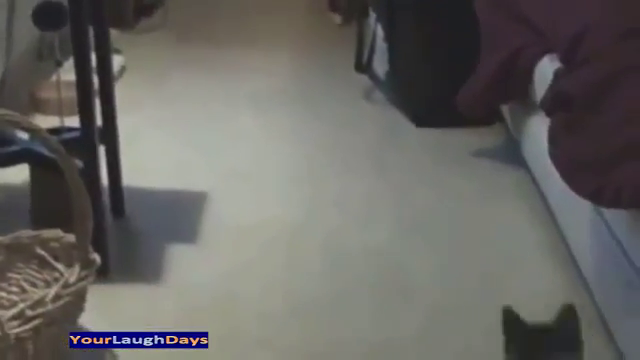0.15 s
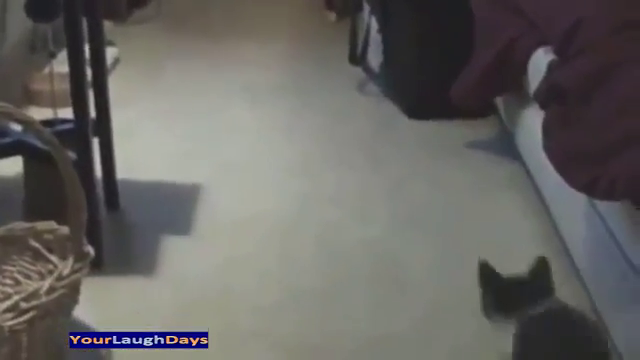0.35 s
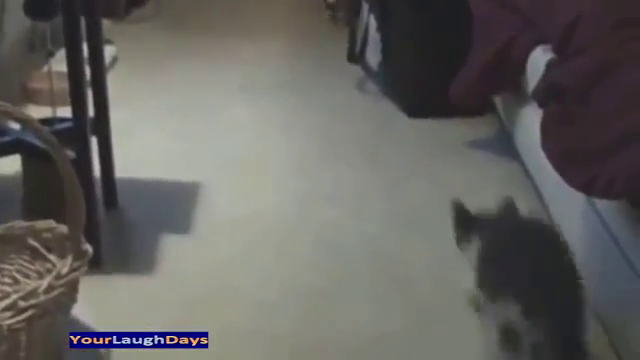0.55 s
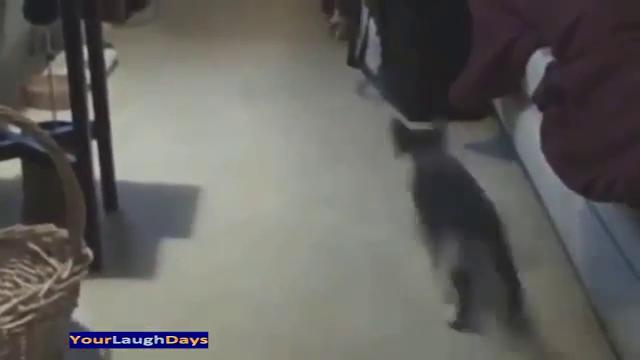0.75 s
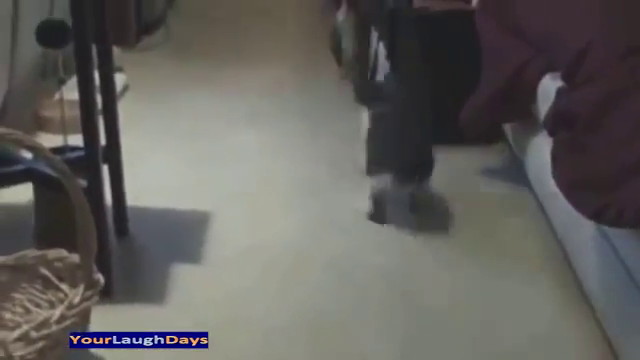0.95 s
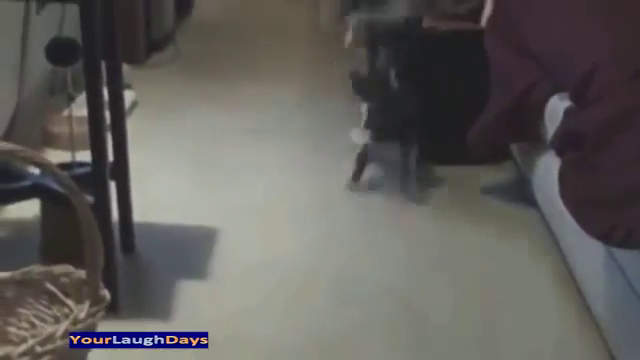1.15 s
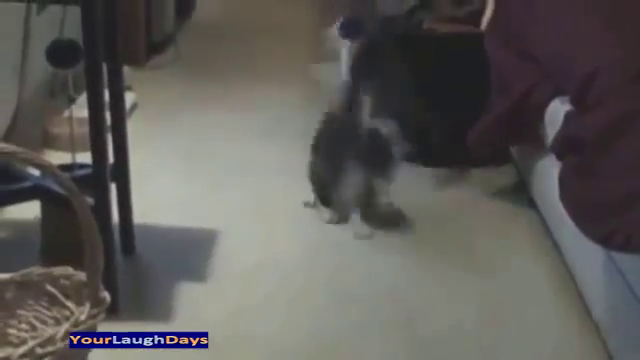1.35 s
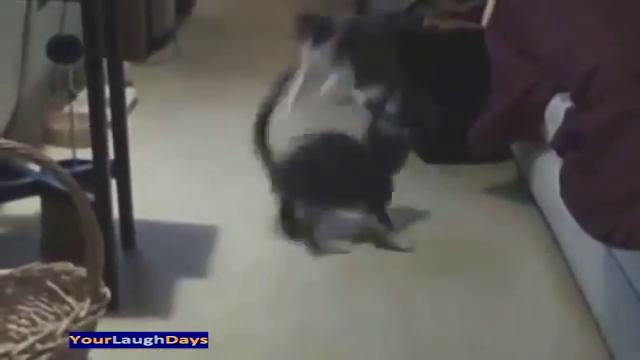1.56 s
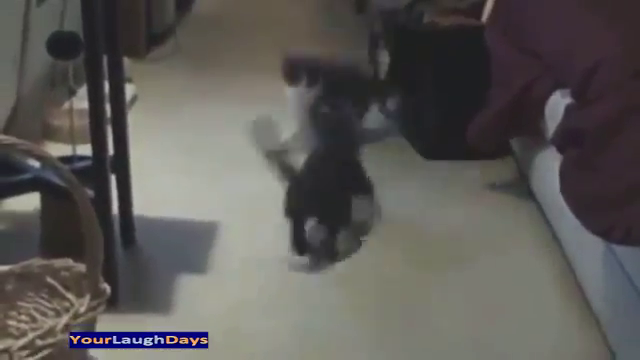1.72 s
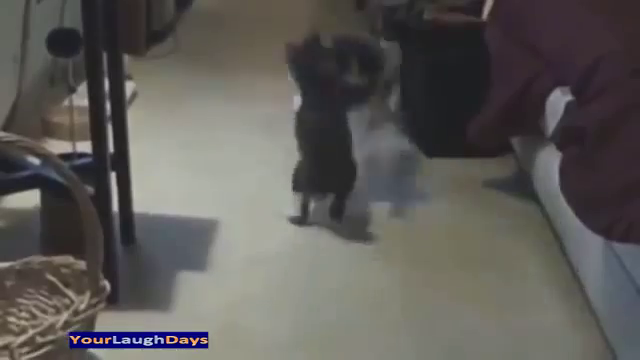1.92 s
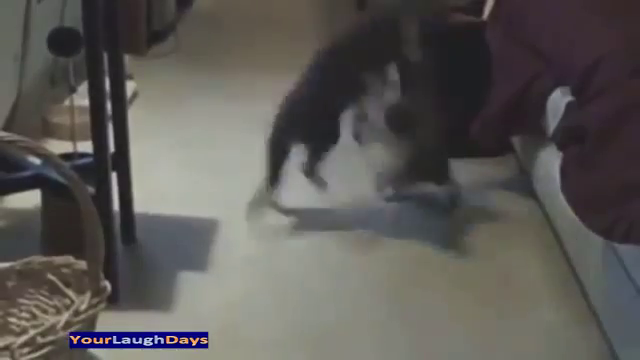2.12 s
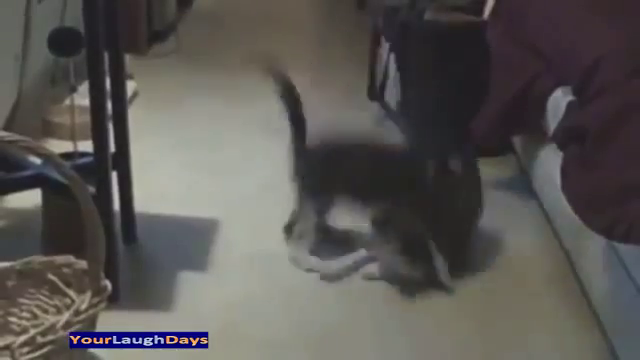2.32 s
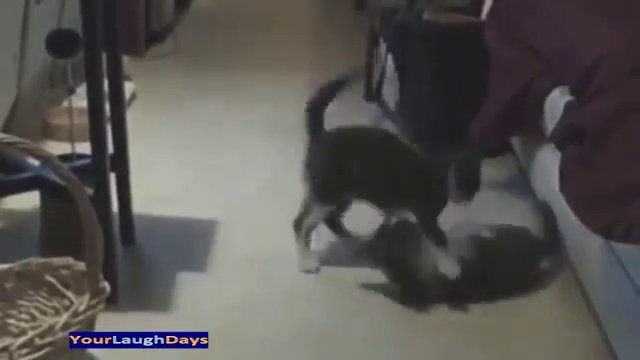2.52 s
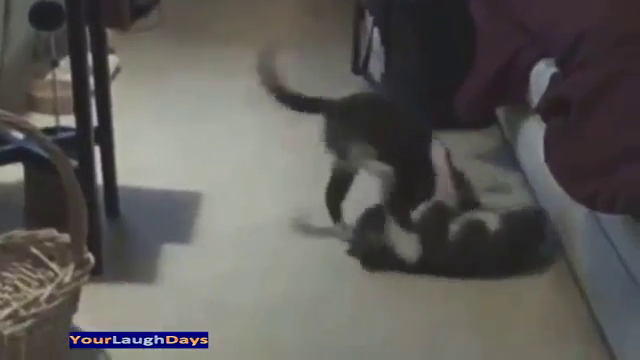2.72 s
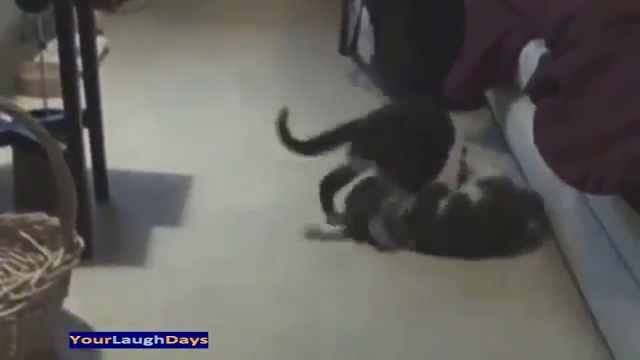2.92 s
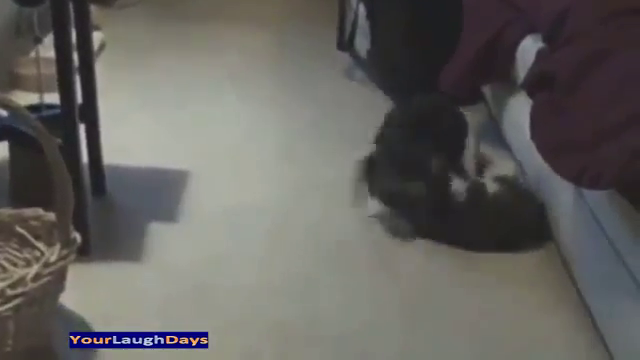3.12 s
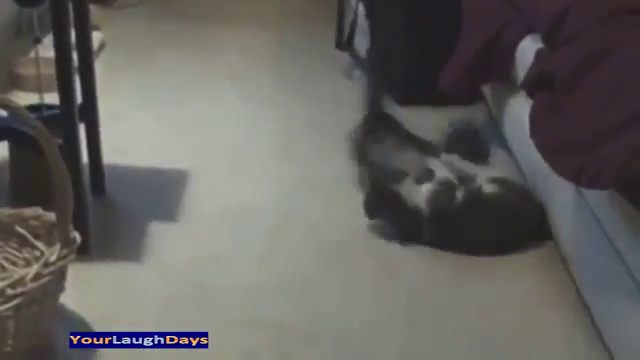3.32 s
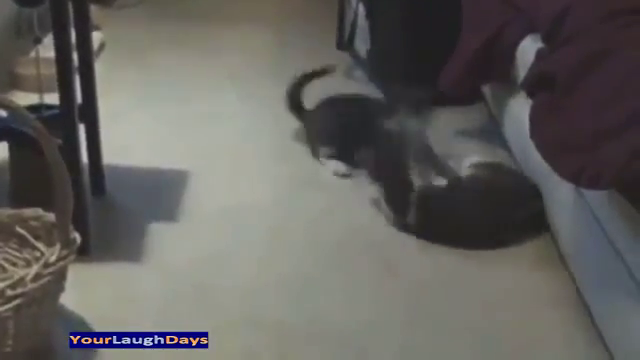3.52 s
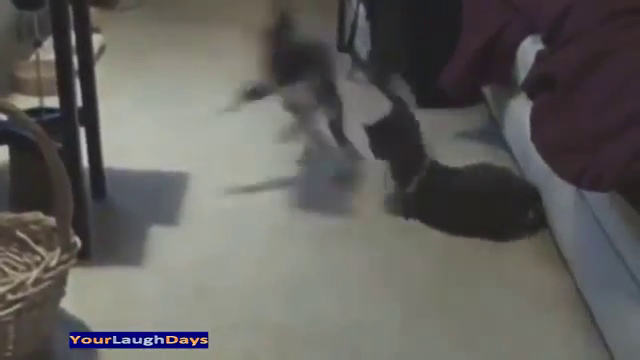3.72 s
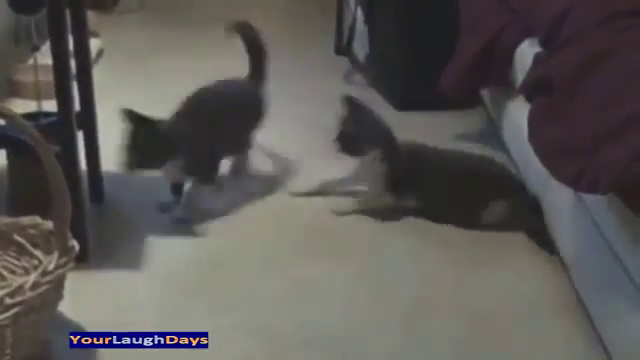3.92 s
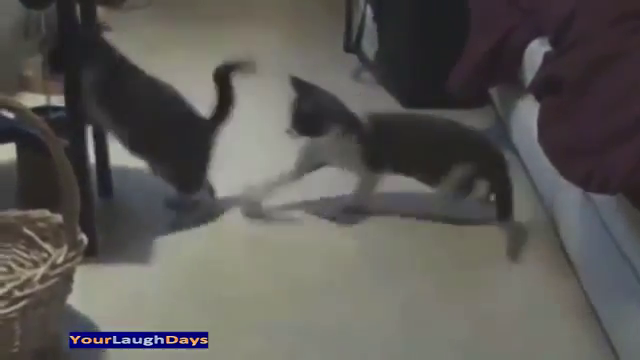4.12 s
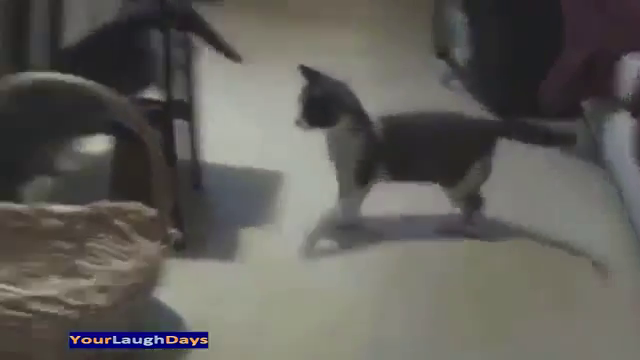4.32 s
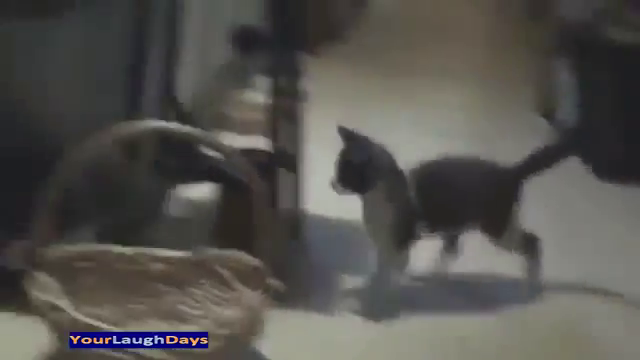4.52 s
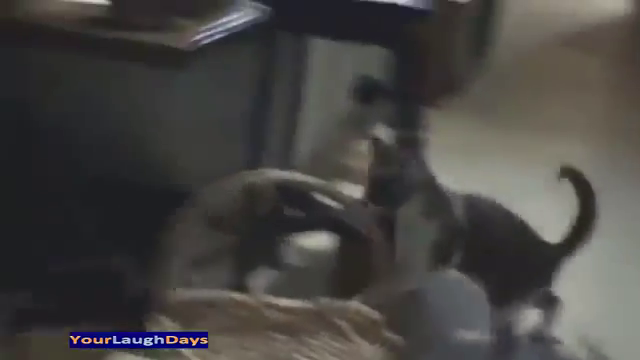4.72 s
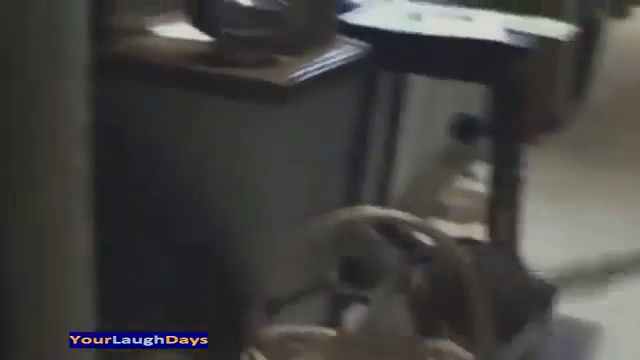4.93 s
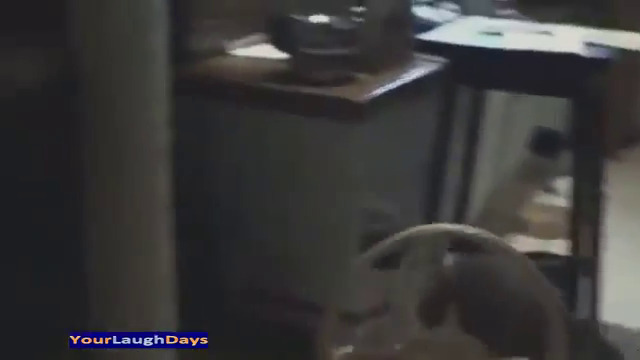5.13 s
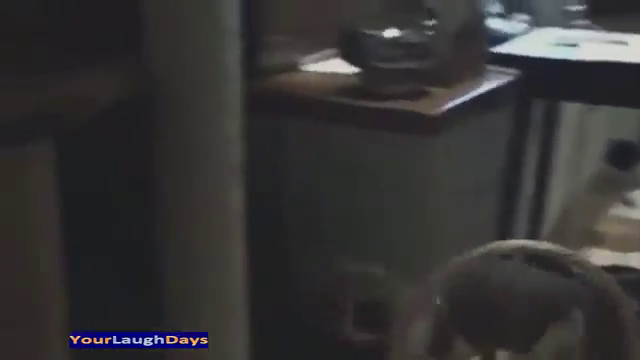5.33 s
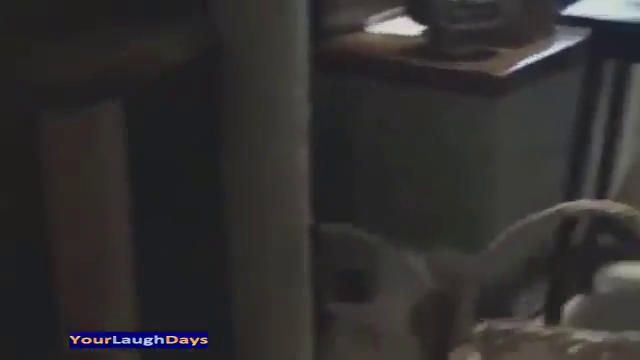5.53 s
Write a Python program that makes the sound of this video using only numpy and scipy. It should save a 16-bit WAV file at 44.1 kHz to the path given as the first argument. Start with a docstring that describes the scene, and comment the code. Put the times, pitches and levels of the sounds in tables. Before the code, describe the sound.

For the first second there is only very faint microphone hiss in a small carpeted room. From about 1.1 s paws begin to land, and by 1.3 s two cats are wrestling: quick, uneven, hollow thumps on springy boards, padded slaps, claw ticks and short grainy drags through the pile. Blows cluster densely at 1.5-1.8 s, then come heavier around 2.0, 2.4, 2.54, 2.65 (the strongest thump) and 2.78 s, with deep bass sway. From 2.9 to 3.5 s it is mostly quiet, with slight shuffling. A low floor boom comes near 3.6 s and a firm knock at 3.75 s; a faint small motor buzzes at 3.5-3.7 and 3.85-4.0 s. Softer footfalls follow from 4.1 s, with a bright claw tick at 4.23 s, thinning to light steps and scratches around 5.3 s. At 5.53 s a sharp, dry plastic click snaps close to the microphone, by far the loudest sound, before the end at about 5.66 s.

```python
"""A small room with a carpeted, springy floor: two cats wrestle near a hand-held camera. Paws and bodies thump
the boards, each blow a set of ringing modes with noisy slaps and rattles. Claws and paws tick as short rings
with noise, claws drag through the pile as grainy noise; the floor sways in the deep bass. A small motor, a
stack of sine orders, buzzes twice; close to the microphone the camera case snaps once. Microphone hiss,
coloured noise of drifting level, lies under it all."""
import sys
import numpy as np
from scipy import signal
from scipy.fft import rfft, irfft
from scipy.io import wavfile
from scipy.ndimage import uniform_filter1d

SR = 44100
rng = np.random.default_rng(int(sys.argv[2]) if len(sys.argv) > 2 else 0)


def dump_mix(stems):
    """Bounce the given channels to the path in sys.argv[1] as a 16-bit WAV at rate SR."""
    frames = np.atleast_2d(stems).T  # one column per channel
    limited = np.clip(frames, -1, 1)  # hard clip at full scale
    pcm = np.round(limited * 32767).astype(np.int16)
    wavfile.write(sys.argv[1], SR, pcm)


N = 249606
TIME = np.arange(N) / SR
AFTER = np.arange(int(0.22 * SR)) / SR  # time since a hit [s]


def undb(db):
    """Decibels to gain."""
    return np.exp(np.asarray(db) * (np.log(10) / 20))


def unit(x):
    """Scale to rms 1."""
    return x / np.sqrt(np.mean(x ** 2))


def curve(rows):
    """Gain over time, in straight dB lines between (time [s], level [dB]) rows."""
    rows = np.array(rows)
    return undb(np.interp(TIME, rows[:, 0], rows[:, 1]))


def peak(s, rise_db_s, fall_db_s, db):
    """Gain that climbs to db at time s and sinks again, in straight dB slopes."""
    below_db = np.where(TIME < s, rise_db_s * (s - TIME), fall_db_s * (TIME - s))
    return undb(db - below_db)


def band(x, lo_hz, hi_hz, order=2):
    """Band-pass."""
    edges = [lo_hz, min(hi_hz, 0.45 * SR)]
    return signal.sosfilt(signal.butter(order, edges, "band", fs=SR, output="sos"), x)


def colour(x, points):
    """Shape a spectrum by (frequency [Hz], gain [dB]) points on a log frequency axis."""
    hz, db = np.transpose(points)
    f = np.maximum(np.arange(len(x) // 2 + 1) * SR / len(x), 1)
    gain = undb(np.interp(np.log(f), np.log(hz), db))
    return irfft(rfft(x) * gain, len(x))


def walk(rate):
    """Random levels, each held 1 / rate seconds, then smoothed twice over that time."""
    k = int(SR / rate)
    held = np.repeat(rng.standard_normal(N // k + 1), k)
    return uniform_filter1d(uniform_filter1d(held, k), k)[:N]


def add(out, s, x, db):
    """Mix x in at time s with its crest at db."""
    i = int(s * SR)
    x = x[:N - i]
    out[i:i + len(x)] += x * undb(db) / np.abs(x).max()


def fade(t60, rise_s=0.):
    """A short straight rise times a decay of 60 dB in t60 seconds."""
    rise = np.minimum((AFTER + 1e-9) / (rise_s + 1e-9), 1)
    return np.exp(-np.log(1000) * AFTER / max(t60, 0.002)) * rise


def ring(modes, stretch, near_hz=None, fall_db=13.5, scatter=1):
    """Decaying modes start together; those near near_hz ring most, gains and pitches scatter with each hit."""
    luck = scatter * rng.standard_normal((len(modes), 2)) * (2.5, 0.03)  # gain [dB], share of the pitch
    out = np.zeros(len(AFTER))
    for (hz, db, t60), (gain_db, detune) in zip(modes, luck):
        octaves_away = abs(np.log2(hz / (near_hz or hz)))
        tone = np.sin(2 * np.pi * hz * (1 + detune) * AFTER)
        out += undb(db + gain_db - fall_db * octaves_away) * tone * fade(t60 * stretch, scatter * 0.4 / hz)
    return out


def burst(lo_hz, hi_hz, t60, tail_db, crack_s=0.0043, grain_db=1.0, rise_s=0.0005):
    """Band-passed noise: a few ms of crack, then a weaker tail of small uneven contacts and room."""
    shape = fade(crack_s, rise_s) + undb(tail_db) * fade(t60, 3 * rise_s)
    contacts = rng.exponential(size=len(shape) // 100 + 1)
    contacts = np.repeat(contacts, 100)[:len(shape)]  # each holds for 100 samples
    noise = rng.standard_normal(len(shape))
    return band(shape * undb(grain_db * contacts) * noise, lo_hz, hi_hz)


def soften(x, push_s):
    """A padded paw pushes for a while instead of striking at once."""
    return np.convolve(x, np.hanning(int(push_s * SR) + 3))[:len(x)]


def blows():
    """Each blow rings joists, boards and a hollow panel, slaps the pile and clicks a claw."""
    # paw and body blows: (time [s], knock level [dB], knock pitch [Hz], thud level [dB],
    # slap level [dB], slap pitch [Hz])
    hits = [(1.061, -51, 716, -48.5, -70, 999), (1.272, -23.5, 590, -29, -38.5, 1640),
            (1.288, -37, 557, -28, -38, 1280), (1.319, -33.5, 614, -31, -58, 937),
            (1.381, -29, 440, -30, -30.5, 1255), (1.455, -36, 565, -39, -42, 990),
            (1.526, -31.5, 466, -29, -33.5, 2080), (1.563, -23, 560, -37.5, -36, 1340),
            (1.623, -28.5, 625, -38, -28, 1250), (1.633, -28.5, 500, -36, -28.5, 1950),
            (1.667, -32, 504, -28, -40.5, 1510), (1.696, -20.5, 620, -18.5, -30, 1240),
            (1.707, -15, 435, -41, -24, 1520), (1.722, -20.5, 510, -23.5, -29, 2010),
            (1.746, -28, 439, -26, -36, 1530), (1.769, -34, 478, -41, -35.5, 1046),
            (1.883, -33, 785, -36, -43, 1250), (1.994, -18.5, 570, -19, -32.5, 1080),
            (2.025, -36, 544, -35, -37.5, 1150), (2.142, -47, 557, -54, -61, 2000),
            (2.198, -32.5, 510, -27, -40, 970), (2.235, -33, 506, -29.5, -38, 930),
            (2.372, -21.5, 463, -23, -29, 1330), (2.391, -18.5, 524, -28, -26, 1220),
            (2.539, -15, 530, -17, -28, 2200), (2.639, -38, 640, -30.5, -34.5, 1680),
            (2.65, -8.5, 547, -16.5, -26.5, 980), (2.677, -24.5, 534, -49, -31, 1240),
            (2.689, -29, 540, -31, -52, 1090), (2.725, -38, 482, -23.5, -58, 1360),
            (2.781, -13, 617, -21.5, -24, 1770), (2.908, -41, 623, -39, -62, 1250),
            (3.257, -46, 412, -51, -51, 1080), (3.554, -48, 487, -37, -60, 1490),
            (3.598, -36, 592, -29.5, -61, 1640), (3.737, -33, 464, -36, -59, 950),
            (3.753, -15.5, 475, -24, -59, 970), (3.77, -32, 415, -28, -63, 991),
            (3.794, -29.5, 604, -29.5, -30.5, 1410), (3.813, -58, 684, -30, -38.5, 1740),
            (3.993, -42.5, 555, -40, -58, 2390), (4.126, -29, 394, -24.5, -52, 2360),
            (4.146, -30.5, 630, -24.5, -44, 940), (4.185, -30, 730, -31, -46, 2300),
            (4.219, -23.5, 537, -27.5, -37, 2110), (4.39, -33.5, 397, -37, -51, 1440),
            (4.481, -33, 670, -26, -36.5, 2560), (4.52, -38, 384, -30, -53, 1880),
            (4.702, -41, 900, -39, -46, 1070), (4.726, -35, 670, -33.5, -34.5, 1130),
            (4.744, -38.5, 680, -30.5, -40, 1150), (4.837, -48, 522, -45, -46, 1040),
            (4.882, -38.5, 373, -43, -37.5, 1060), (4.949, -38.5, 550, -42, -40, 1170),
            (5.056, -29, 645, -32, -40, 1020), (5.225, -50, 386, -25.5, -55, 1240),
            (5.274, -35.5, 740, -28.5, -35.5, 1200), (5.3, -57, 500, -40, -50, 1700),
            (5.325, -59, 680, -30.5, -48, 1730), (5.355, -37, 434, -22, -45, 1180)]
    # modes of the floor: (frequency [Hz], gain [dB], share of the ring time)
    joists = [(65, 6, 0.53), (87.7, 20.5, 0.9), (99, 9.5, 0.71), (117.1, -1.5, 2.4)]
    boards = [(149.8, -4, 1.56), (189.4, -0.5, 1.09), (223.8, -2.5, 1.28), (255.4, -3, 1.03),
              (302.7, -4.5, 1.06)]
    panel = [(370, 6.5, 0.33), (459, -7, 1), (525.4, 9.5, 0.33), (586.6, 3.5, 0.68), (658.7, 3, 0.95),
             (755, 8.5, 0.53), (890, 1, 1)]
    ring_s = 0.094  # ring time that the shares refer to
    joists_db, claw_db = -4.5, -9.5  # joists against the thud, claw against the slap
    out = np.zeros(N)
    for s, knock_db, knock_hz, thud_db, slap_db, slap_hz in hits:
        knock = soften(ring(panel, ring_s, knock_hz, 31.3), 0.0015)
        rattle = burst(0.43 * knock_hz, 1.4 * knock_hz, 1.56 * ring_s, -0.67)
        add(out, s, unit(knock) + 0.51 * unit(rattle), knock_db)

        add(out, s, soften(ring(joists, ring_s), 0.0058), thud_db + joists_db)
        add(out, s, soften(ring(boards, ring_s), 0.0016), thud_db)

        slap = burst(0.542 * slap_hz, 1.566 * slap_hz, 0.5 * ring_s, -0.5)
        tap = ring([(slap_hz, 0, 0.3)], ring_s)  # the spot under the claw rings briefly
        scuff = burst(980, 2390, 2.3 * ring_s, 0)
        add(out, s, 1.1 * unit(tap) + unit(slap) + 0.96 * unit(scuff), slap_db)

        claw = burst(1670, 5200, 0.96 * ring_s, -19)
        add(out, s, claw, slap_db + claw_db)
    return out


def ticks():
    """Claws catch and paws tap: short noisy clicks around one colour; low ones ring more."""
    # crisp ticks and taps of claws and paws, some alone, some on top of a blow: (time [s], level [dB], centre
    # [Hz], fade time of the noise [s])
    tick_rows = [(1.3605, -35, 4520, 0.026), (1.441, -37.5, 5360, 0.034), (1.459, -35, 4800, 0.026),
                 (1.6292, -31.5, 3500, 0.024), (2.1146, -37.5, 5130, 0.012), (2.137, -37, 5760, 0.061),
                 (2.274, -48.5, 2740, 0.025), (2.3466, -43, 2750, 0.012), (3.249, -49.5, 2240, 0.03),
                 (3.4644, -49, 3360, 0.03), (3.489, -41, 5670, 0.028), (4.2275, -23, 5660, 0.0069),
                 (5.3005, -28.5, 6600, 0.014), (5.303, -31, 2920, 0.024), (5.3253, -38.5, 3600, 0.057),
                 (5.588, -42, 5200, 0.02), (5.613, -37, 4760, 0.016), (1.273, -50, 4270, 0.015),
                 (1.526, -38, 2460, 0.019), (1.695, -49, 5500, 0.015), (2.54, -33, 5100, 0.014),
                 (4.145, -39, 5800, 0.017), (4.185, -33.5, 2260, 0.025), (4.703, -31, 1080, 0.013),
                 (4.884, -28.5, 1280, 0.011), (4.482, -40, 2590, 0.028), (4.951, -49, 1510, 0.02),
                 (5.274, -39, 4040, 0.012)]
    out = np.zeros(N)
    for s, db, hz, t60 in tick_rows:
        noise = rng.standard_normal((2, len(AFTER))) * fade(t60)
        tone = ring([(hz, 0, 0.6)], t60)
        narrow = band(noise[0], 0.885 * hz, 1.15 * hz)
        wide = band(noise[1], 0.47 * hz, 1.8 * hz)
        click = 1300 / hz * unit(tone) + 0.66 * unit(narrow) + 0.32 * unit(wide)
        add(out, s, click, db)
    return out


def fibre_slips():
    """Noise of uneven grain: single slips differ in size and their strength wanders."""
    noise = rng.standard_normal(N)
    size_db = 2.5 * rng.exponential(size=N) + 2.4 * walk(250)
    return noise * undb(size_db)


def drag():
    """Dense fibre slips of uneven size, coloured by the pile, with a finer rasp of fur on top."""
    # fur and claws over the pile: (time of the crest [s], rise [s], fall [s], level [dB],
    # bright rasp against the pile [dB])
    pulls = [(1.272, 0.014, 0.079, -57, -10), (1.362, 0.021, .04, -42.5, -16),
             (1.388, 0.043, 0.038, -42.5, -11), (1.448, 0.013, 0.12, -47.5, -24),
             (1.544, 0.029, 0.023, -42.5, -24), (1.632, 0.012, 0.022, -42.5, -2),
             (1.7, 0.019, .12, -60, -9), (1.765, 0.04, 0.15, -48, -12), (1.929, 0.022, 0.23, -48, -9.5),
             (1.994, 0.055, 0.075, -39, -23), (2.141, 0.017, 0.04, -49, -24),
             (2.396, 0.055, 0.018, -57, -15), (2.66, .012, 0.084, -40.5, -21),
             (2.69, 0.037, 0.042, -49, -9), (2.781, .008, .03, -66, -12), (3.497, 0.057, 0.018, -51, -15),
             (3.798, .03, .05, -68, -5), (4.234, 0.056, 0.094, -46, -14), (4.496, 0.028, 0.038, -47.5, -11),
             (4.84, 0.13, 0.085, -56.5, -3), (4.98, 0.54, 0.58, -56, 0), (5.301, 0.0035, 0.017, -36, -3),
             (5.325, 0.022, 0.07, -48.5, -3), (5.61, 0.25, 0.018, -53.5, -0.5)]
    # colours of pile and rasp: (frequency [Hz], gain [dB])
    pile_colour = [(500, 9), (1000, -2.5), (2500, -0.5), (3800, -3.5), (4700, -1.5), (5600, -0.5),
                   (6800, -5), (8500, -15), (12000, -54)]
    rasp_colour = [(5000, -5), (8000, 0.5), (11000, 2), (15000, -1.5)]
    depth_db = 20  # drop below the crest over the rise and over the fall
    strokes = np.array([peak(s, depth_db / rise_s, depth_db / fall_s, db)
                        for s, rise_s, fall_s, db, _ in pulls])
    pile = unit(colour(fibre_slips(), pile_colour))
    rasp = unit(colour(fibre_slips(), rasp_colour))
    rasp_gains = undb([row[-1] for row in pulls])
    return pile * strokes.sum(axis=0) + rasp * (rasp_gains @ strokes)


def floor():
    """The floor sways slowly in the deep bass near 29 Hz; small steps shuffle the boards between the blows."""
    # weight lands and the joists swing: (time of the crest [s], level [dB])
    landings = [(1.12, -52), (1.29, -36.5), (1.47, -47), (1.58, -38), (1.72, -27.5), (1.91, -34.5),
                (2.013, -36.5), (2.17, -41), (2.27, -34), (2.37, -47), (2.54, -46), (2.66, -26),
                (2.76, -29), (2.95, -38.5), (3.2, -37.5), (3.635, -24.5), (3.77, -32.5), (3.89, -40.5),
                (4.18, -28), (4.29, -40.5), (4.4, -35), (4.57, -43.5), (4.76, -39.5), (4.88, -39.5)]
    # swing between landings: (time [s], level [dB])
    rest = [(0.0, -63.5), (0.8, -63), (1.2, -51), (4.9, -54.5), (5.66, -46)]
    # how busily the feet shuffle: (time [s], level [dB])
    busy = [(0.0, -60.5), (0.7, -63), (1.3, -60.5), (1.46, -44), (1.87, -46.5), (1.97, -44.5), (2.6, -49.5),
            (2.7, -45.5), (2.83, -53), (3.56, -50), (4.6, -50), (4.87, -45.5), (5.08, -57.5), (5.33, -39),
            (5.42, -41.5), (5.66, -48.5)]
    sway_hz, width_hz = 28.65, 16.2
    rise_db_s, fall_db_s = 358, 244  # slopes before and after each landing [dB/s]

    sway = band(rng.standard_normal(N), sway_hz - width_hz / 2, sway_hz + width_hz / 2)
    sway = sway / (1.2 * sway.std() + np.abs(signal.hilbert(sway)))  # evens the swing: the weight sets it
    weight = curve(rest) + sum(peak(s, rise_db_s, fall_db_s, db) for s, db in landings)
    sway = uniform_filter1d(unit(sway) * weight, size=200)  # joists are too heavy to jerk

    steps = rng.standard_normal(N) * undb(4.0 * walk(25))
    shuffle = colour(steps, [(30, -40), (60, 4.0), (130, -4.5), (250, -13.5), (500, -24),
                             (1000, -31), (3000, -54)])
    return sway + unit(shuffle) * curve(busy)


def snap():
    """The plastic case clicks close to the microphone: short modes with a brief rattle."""
    # modes of the case: (frequency [Hz], gain [dB], relative ring time, scaled by 0.75 to seconds)
    case = [(740, -35, 0.018), (1160, -3.5, 0.019), (1330, -5, 0.013), (1720, 12.5, 0.0095),
            (2210, 2.5, 0.022), (3060, -15, 0.015), (3090, 2, 0.021), (4450, -15, .007), (4700, 2.5, 0.012),
            (6950, -6, 0.0075), (7800, 0.5, 0.0048), (9240, 4, 0.0037), (12200, -5, 0.0043),
            (12130, 4.5, 0.014), (14100, -1, .007), (15100, -10, .007)]
    out = np.zeros(N)
    rattle = burst(510, 3400, 0.056, -23, crack_s=0.011, grain_db=0.1, rise_s=0.0005)
    click = unit(ring(case, 0.75, scatter=0)) + 0.75 * unit(rattle)
    add(out, 5.5318, click, -4)  # time [s], crest [dB]
    return out


def buzz():
    """A steady little motor heard through its housing: orders of a slightly wandering turning rate."""
    # spells of running: (start [s], end [s])
    spells = [(3.51, 3.7), (3.85, 4.01)]
    # orders of the motor: (multiple of the turning rate, level [dB])
    orders = [(1, 0), (2, -6), (3, -4), (4, -14), (7, -8), (9, -8), (10, -10), (11, -16), (13, -16),
              (16, -18), (19, -20)]
    turn_hz, edge_s, level_db = 166.5, 0.025, -53.5
    running = sum(np.clip(np.minimum(TIME - start, end - TIME) / edge_s, 0, 1) for start, end in spells)
    turn = 2 * np.pi * np.cumsum(turn_hz * (1 + 0.00307 * walk(11))) / SR
    tone = np.zeros(N)
    for k, db in orders:
        tone += undb(db + 1.0 * walk(25)) * np.sin(k * turn + k * k)  # k * k spreads the phases
    return unit(tone) * undb(level_db) * running


def hiss():
    """Smooth microphone hiss: coloured noise, scaled by its upper band."""
    # level of the upper band: (time [s], level [dB])
    level = [(0.0, -74), (1.3, -72), (1.45, -64.5), (3.0, -64), (3.5, -61), (4.4, -61), (4.8, -63.5),
             (5.66, -61)]
    # colour of the hiss: (frequency [Hz], gain [dB])
    hiss_colour = [(88, -32), (150, -15), (234, 0), (296, -16), (346, -12.5), (490, -10), (1660, -16),
                   (1910, -15.5), (14100, -24), (15500, -26)]
    x = colour(rng.standard_normal(N), hiss_colour)
    return x / band(x, 7140, 16200, order=6).std() * curve(level)


def scene():
    """All sources at one microphone."""
    return (blows() + ticks() + drag() + floor() + snap() + buzz() + hiss())[None]


def record(dry):
    """The camera cuts the top: a steep low-pass at 15050 Hz."""
    return signal.sosfilt(signal.ellip(10, 0.3, 60, 15050, fs=SR, output="sos"), dry)


dry = scene()
out = record(dry)
dump_mix(out)
```